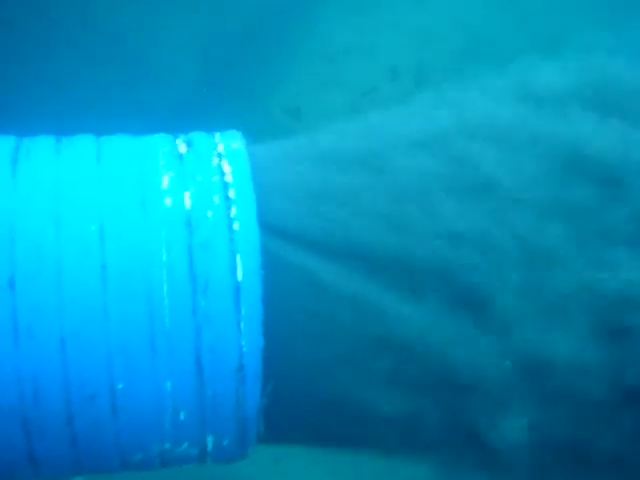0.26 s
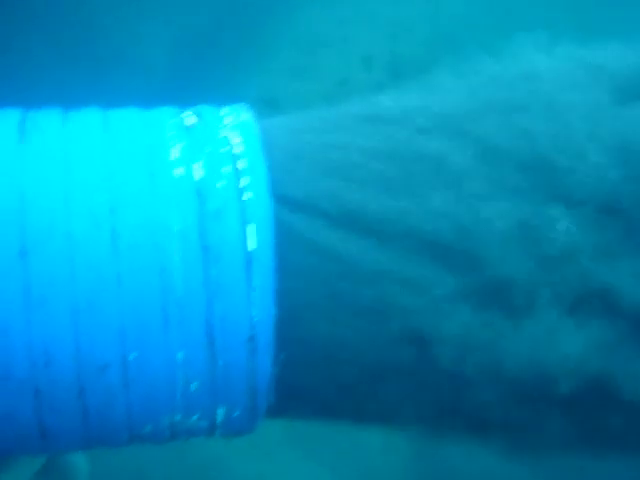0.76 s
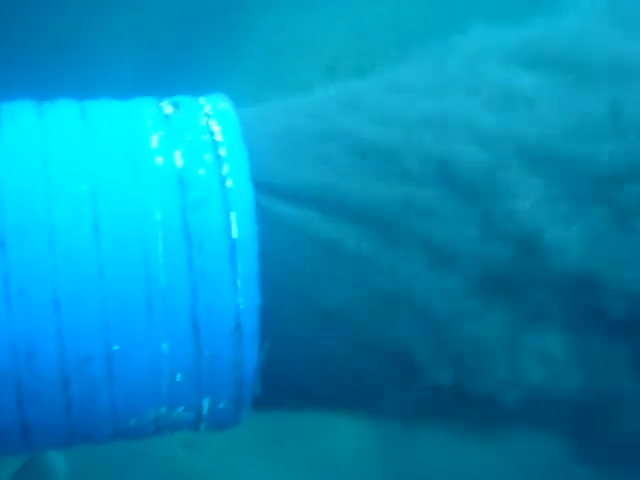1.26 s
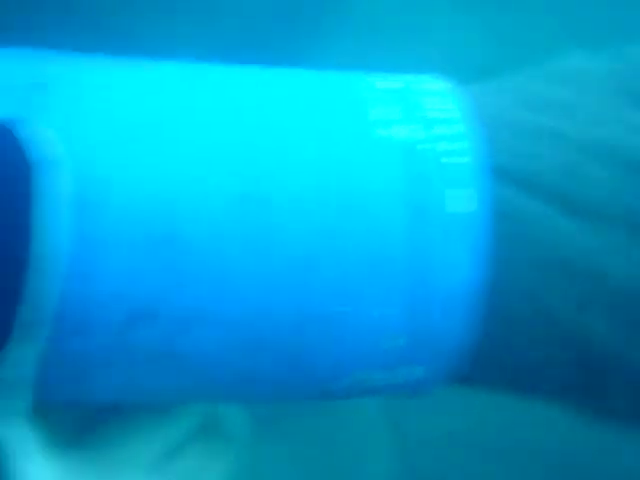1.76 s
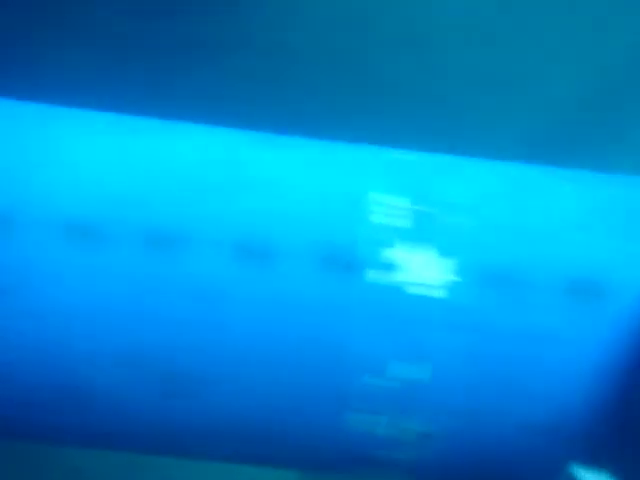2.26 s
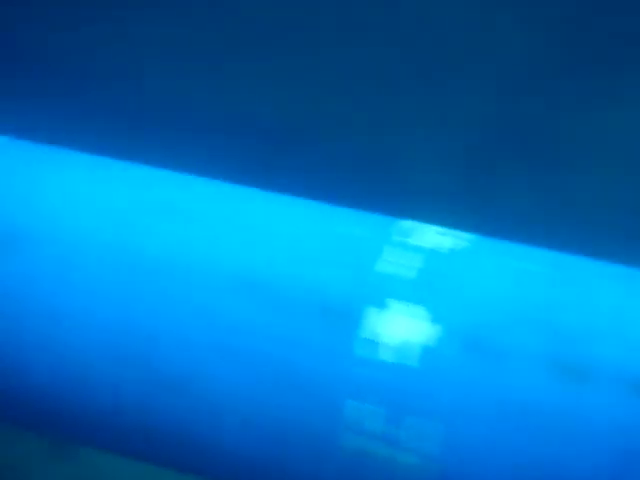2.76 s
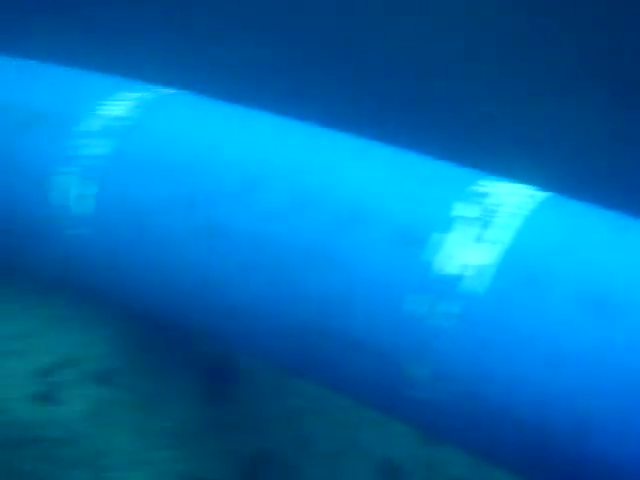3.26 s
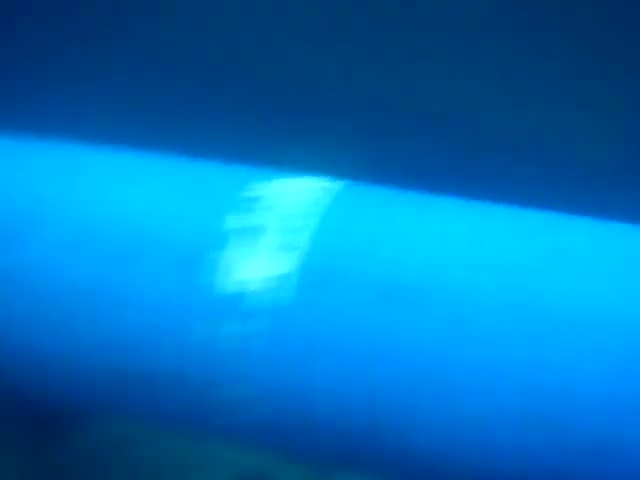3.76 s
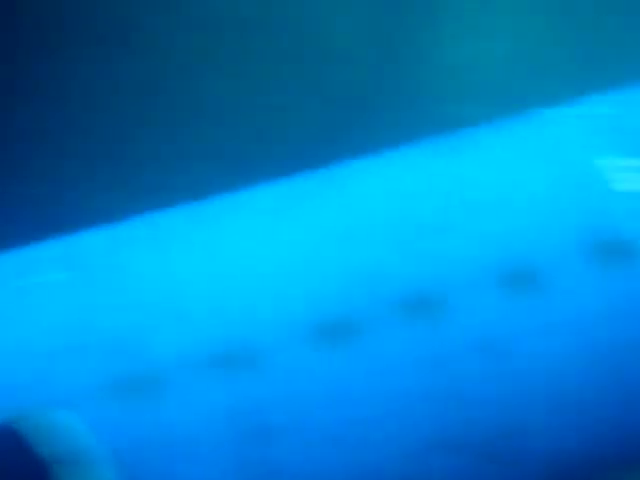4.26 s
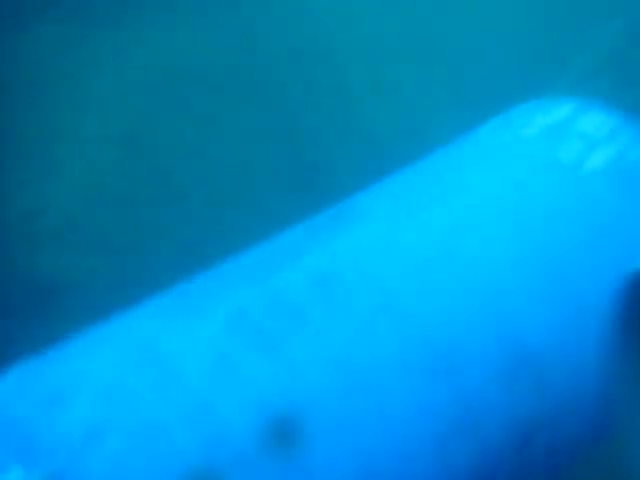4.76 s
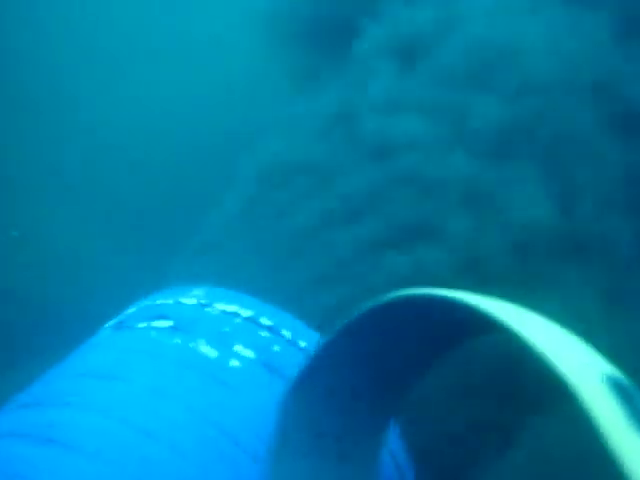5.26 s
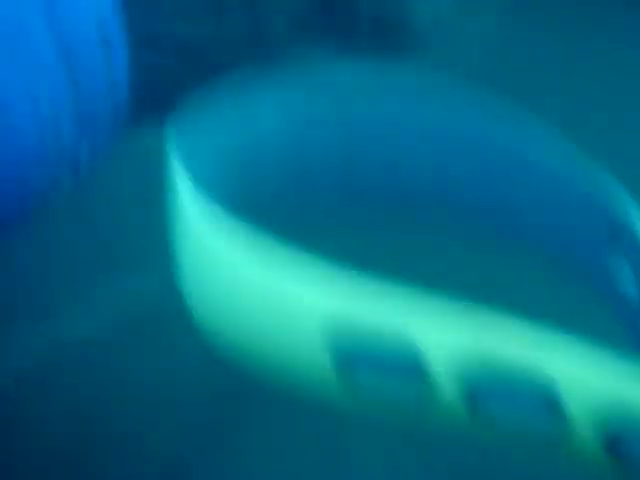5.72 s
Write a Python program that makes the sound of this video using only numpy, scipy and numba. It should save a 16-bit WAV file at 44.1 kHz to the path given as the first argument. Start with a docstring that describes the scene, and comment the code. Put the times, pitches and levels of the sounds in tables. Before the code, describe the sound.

A continuous rough, hissing suction roar fills the whole stretch, mixed with a metallic pump whine and a low-mid motor hum. A faint tick comes early. Along the hose the colour changes and some whine tones fade; around four seconds the midrange roar swells, then a loud click. Near the end the hiss dulls, bubbles plop upward and a deep rumble surges. Close, muffled-bass camera microphone under water, no open-air echo.

```python
"""Water and sand rush hissing through a dredge hose under water, with the pump's whine and the motor's hum.
The rush is shaped noise; with the faint overtones of the whine it passes the resonances of hose and camera housing,
whose strengths follow the camera as it turns from the mouth, along the hose and past the mouth again.
The echo off the hose wall cuts a moving dip into the treble of that sum. Sine overtones of pump and motor,
a deep rumble with a low drone, pulses for ticks and rising decaying sines for bubbles are added on top."""
import sys
import numpy as np
from scipy import signal
from scipy.fft import rfft, irfft, next_fast_len
from scipy.io import wavfile
from scipy.ndimage import uniform_filter1d
from numba import njit

SR = 44100
rng = np.random.default_rng(int(sys.argv[2]) if len(sys.argv) > 2 else 0)


def inscribe(sig):
    """Save sig as 16-bit PCM at rate SR to the path in sys.argv[1].

    A 1-D sig is mono; a 2-D sig holds one channel per row.
    Samples are clipped to [-1, 1] before scaling.
    """
    pcm = np.round(np.clip(np.atleast_2d(sig).T, -1, 1) * 32767)
    wavfile.write(sys.argv[1], SR, pcm.astype(np.int16))


N = 264159
T = np.arange(N) / SR  # time in seconds
FFT_LENGTH = next_fast_len(N, True)
HZ = np.maximum(np.fft.rfftfreq(FFT_LENGTH, 1 / SR), 1)  # kept off zero for the divisions


def undb(db):
    """Level law: decibels to an amplitude factor."""
    return 10 ** (np.asarray(db) / 20)


def walk(rate):
    """Band-limited random modulation: a new level every 1 / rate s, joined smoothly, spread near 1."""
    draws = rng.standard_normal(int(T[-1] * rate) + 3)
    steps = uniform_filter1d(np.repeat(draws, 8), 8)
    smooth = uniform_filter1d(steps, 8)
    return 1.3 * np.interp(T * rate * 8, np.arange(len(steps)), smooth)


def flutter(rate):
    """High-passed modulation: a quick walk without its slow drift."""
    quick = walk(rate)
    return quick - uniform_filter1d(quick, int(4 * SR / rate))


def plateau(times):
    """Piecewise-linear envelope: rises from 0 to 1, holds and falls back."""
    return np.interp(T, times, (0, 1, 1, 0))


def shaped(x, gain):
    """Zero-phase filtering: weights the spectrum by a gain per frequency."""
    return irfft(rfft(x, FFT_LENGTH) * gain, FFT_LENGTH)[:N]


def stack(phase, orders, waver_db, rate):
    """Harmonic synthesis: sines on multiples of one phase, each wavering in level on its own."""
    total = 0
    for order, level_db in orders:
        amplitude = np.sqrt(2) * undb(level_db + waver_db * walk(rate))  # level is rms
        total = total + amplitude * np.cos(order * phase + 2 * np.pi * rng.random())
    return total


def camera_shares():
    """Panning law: the shares of the view along the hose and past the mouth, 0 to 1."""
    # Path of the camera. Each row: time in seconds, share along the hose, share past the mouth.
    path = [(0, 0.08, 0.29), (.5, 0.21, 0), (1.5, 0.22, 0.07), (2, 0.55, 0), (2.8, 0.99, 0.05),
            (3.6, 0.99, .05), (4, 0.73, .04), (4.6, .07, 0.35), (5.2, 0.01, 0.56), (5.8, 0.09, 0.89),
            (5.99, 0.08, 0.85)]
    s, *shares = np.transpose(path)
    return [np.clip(np.interp(T, s, share), 0, 1) for share in shares]


def flow(boom_db):
    """Turbulence noise of one unit of power per hertz, amplitude-modulated by random flutter, in treble most."""
    foot_hz, boom_hz, treble_hz = 200, 750, 6300  # lower slope, top of the boom, foot of the treble
    roar_hz, roar_width_hz, roar_db = 2900, 650, 2.5
    roar_s = (3.65, 3.9, 4.8, 5.4)  # roar starts to swell, is full, starts to fade, is gone
    white = rng.standard_normal(N) * np.sqrt(SR / 2)
    water = shaped(white, 1 / np.sqrt(1 + (foot_hz / HZ) ** 4))
    boom = shaped(water, 1 / (1 + (HZ / boom_hz) ** 4))
    roar = shaped(water, np.exp(-((HZ - roar_hz) / roar_width_hz) ** 4))
    treble = shaped(water, 1 / (1 + (treble_hz / HZ) ** 8))
    roar_gain = undb(roar_db * plateau(roar_s) + 1.03 * flutter(11))
    middle = water - boom - treble + roar * (roar_gain - 1)
    middle_db = 0.8 * flutter(21.97) + 1.03 * flutter(80)
    treble_db = 0.44 * middle_db + 2.0 * flutter(120) + 0.8 * flutter(9)
    hiss = middle * undb(middle_db) + treble * undb(treble_db)
    return boom * undb(boom_db + 1.1 * flutter(50)) + hiss


def vane_phase():
    """Vane-passing rate integrated to a phase in radians: under load the pump slows for a while."""
    free_hz, sag_hz = 354.06, 0.5
    sag_s = (2.9, 3.3, 4.65, 5.45)  # starts to sag, is lowest, starts to recover, is back
    rate_hz = free_hz - sag_hz * plateau(sag_s) + 0.0598 * walk(3.05)
    return 2 * np.pi * np.cumsum(rate_hz) / SR


def faint_whine(vane):
    """Harmonics of the vane-passing rate that lie near the flow noise."""
    # Each row: multiple of the vane rate, level in dB over one hertz of flow noise (ahead of the resonances).
    faint = [(2, 19.5), (3, 16), (4, 10), (5, 10.5), (6, 14.5), (9, 18), (11, 17), (15, 11.5), (17, 3.5),
             (18, -4), (19, 16), (20, 3.5), (21, 9), (22, 10.5), (23, 13.5), (24, 20.5), (26, 20.5),
             (27, 23), (28, 17.5)]
    return stack(vane, faint, waver_db=1.5, rate=2.4)


def body(x, along, past):
    """Modal filtering: steep resonances whose strengths depend on where the camera points."""
    # Resonances of hose and housing. Each row: centre in Hz, half-width to -6 dB in Hz,
    # gain in dB at the mouth, gain in dB along the hose, gain in dB past the mouth.
    resonances = [(252, 26, -41.5, -55, -48.5), (277, 94.7, -48, -47, -42),
                  (385.5, 58.8, -39.5, -42.5, -36.5), (450, 54, -49, -46, -41),
                  (536, 29, -51.5, -60, -75.5), (673, 160, -83, -57, -74), (1192, 83, -49.5, -50.5, -66),
                  (1322, 100, -51, -46.5, -55), (1462, 117, -50.5, -44, -54), (1792, 145, -58, -57, -64),
                  (2127, 120, -58, -57, -69), (2495, 121, -43.5, -43, -61), (2702, 178, -46, -46.5, -55),
                  (2967, 150, -48.5, -47.5, -65), (3130, 240, -50, -52.5, -58), (3485, 200, -54, -57, -54),
                  (4007, 184, -49.5, -52.5, -74), (4164, 102, -49.5, -58.5, -53),
                  (4590, 200, -55.5, -56, -64), (4870, 210, -59, -65, -62.5), (5320, 230, -81, -50, -54),
                  (5735, 217, -47, -51.5, -57.5), (6330, 140, -63.5, -61, -51),
                  (6794, 175, -53, -54, -70.5), (7240, 260, -54, -61, -58.5),
                  (7930, 270, -57.5, -56.5, -60.5), (8264, 270, -58.5, -63.5, -62),
                  (9230, 220, -69.5, -73.5, -67), (9336, 190, -62, -65.5, -58),
                  (9750, 170, -66, -70.5, -59)]
    hz, width, *views_db = np.transpose(resonances)
    centre, half_width = hz[:, None], width[:, None]
    detuning = (HZ / centre - centre / HZ) * centre / (2 * half_width)
    power = 1 / (1 + detuning ** 2) ** 2
    mouth, side, behind = (shaped(x, np.sqrt(undb(db) ** 2 @ power)) for db in views_db)
    return np.clip(1 - along - past, 0, 1) * mouth + along * side + past * behind


@njit
def band(x, hz, width):
    """State-variable resonator: a band-pass with a moving centre, gain 1 at the centre."""
    y = np.empty(len(x))
    band_state, low_state = 0., 0.
    for i in range(len(x)):
        g = np.tan(np.pi * hz[i] / SR)
        damping = width / hz[i]
        v = (band_state + g * (x[i] - low_state)) / (1 + g * (g + damping))
        band_state = 2 * v - band_state
        low_state = low_state + 2 * g * v
        y[i] = damping * v
    return y


def echo_dip(x):
    """Interference: the echo off the hose wall cancels part of a moving band, 2200 Hz wide, in the treble."""
    # Each row: time in seconds, centre in Hz, depth from 0 to 1 (whole cancellation at the centre).
    dip = [(0, 9600, .4), (2, 9250, 0.38), (2.8, 7380, 0.48), (4, 7100, .7), (4.12, 8400, 0.6),
           (4.25, 9400, 0.8), (4.6, 9800, 0.54), (4.9, 10200, .02), (5.5, 8050, 0.05), (5.99, 8000, 0.64)]
    s, hz, depth = np.transpose(dip)
    cancelled = band(x, np.interp(T, s, hz), 2200.)
    return x - np.clip(np.interp(T, s, depth), 0, 1) * cancelled


def loud_whine(vane, views):
    """Strong vane-passing harmonics: directional levels that drift as the camera sways, some fading briefly."""
    # Each row: multiple of the vane rate, rms level in dB at the mouth, along the hose and past the mouth,
    # all before drift and fades.
    loud = [(7, -28.5, -25.5, -32), (8, -28.5, -26.5, -35.5), (10, -25, -30, -30.5), (12, -26, -37, -29),
            (13, -33, -31.5, -40), (14, -32.5, -42, -43), (16, -33, -31.5, -38.5)]
    # Fades as the camera moves. Each row: centre in seconds, multiple of the vane rate, depth in dB,
    # half-length in seconds (to 1/e of the depth).
    fades = [(.05, 10, -6, 0.18), (2.6, 7, -10.5, .4), (2.6, 10, -2, 0.38), (3.6, 12, -12, 0.31),
             (4.85, 13, -8, 0.22), (5.3, 7, -12, 0.24), (5.7, 8, -5, .35)]
    orders = []
    for order, *views_db in loud:
        level_db = views_db @ views + 0.8 * walk(2.37)
        for s, faded_order, depth_db, half in fades:
            if faded_order == order:
                level_db = level_db + depth_db * np.exp(-((T - s) / half) ** 2)
        orders.append((order, level_db))
    return stack(vane, orders, waver_db=1.02, rate=8)


def motor_hum(views):
    """Harmonics of a steady motor rate: directional levels that drift as the camera sways."""
    # Each row: multiple of the hum rate, rms level in dB at the mouth, along the hose and past the mouth,
    # all before drift.
    hum = [(1, -26.5, -26, -21), (2, -49, -36.5, -63.5), (5, -35.5, -29, -39.5)]
    hum_hz = 303.3
    orders = [(order, views_db @ views + 0.7 * walk(2.37)) for order, *views_db in hum]
    return stack(2 * np.pi * hum_hz * T, orders, waver_db=1.02, rate=8)


def swells():
    """Gaussian envelopes: bell-shaped changes of rumble, boom and drone, in dB."""
    # Each row: time of the top in seconds, change in dB of rumble, of boom and of drone,
    # rise in seconds, fall in seconds.
    bells = [(0, 13.5, .5, -7, .1, .2), (.8, 0, 0.1, 9.5, .4, 0.49), (4.7, 2, -1.5, 3.5, 0.53, .6),
             (5.58, 2, 2.2, .1, .08, 0.11), (5.92, 20, 1.5, 2, 0.19, .08)]
    total_db = 0
    for s, *changes_db, rise, fall in bells:
        bell = np.exp(-((T - s) / np.where(T < s, rise, fall)) ** 2)
        total_db = total_db + np.outer(changes_db, bell)
    return total_db


def water_rumble(swell_db):
    """Coloured noise: the deep rumble of the open water, at a swelling level."""
    # Corners of the spectrum. Each row: frequency in Hz, relative level in dB per Hz.
    spectrum = [(40, -40), (75, -15.5), (105, -2.5), (140, -0.5), (190, -5.5), (260, -24.5), (400, -62)]
    hz, db = np.transpose(spectrum)
    rumble = shaped(rng.standard_normal(N), undb(np.interp(np.log(HZ), np.log(hz), db)))
    return rumble * undb(-49 + swell_db) / np.std(rumble)


def microphone_noise():
    """Self-noise: steady low noise of the microphone, falling above 70 Hz."""
    mic = shaped(rng.standard_normal(N), 1 / (1 + (HZ / 70) ** 2))
    return mic * undb(-47) / np.std(mic)


def low_drone(swell_db):
    """Frequency modulation: a faint low sine whose pitch wanders."""
    drone_hz = 132.2 + 0.53 * walk(3.6)
    drone = np.sqrt(2) * np.sin(2 * np.pi * np.cumsum(drone_hz) / SR)
    return drone * undb(-51.5 + swell_db)


def grain_ticks():
    """Impact: each grain striking the housing gives one short pulse, the curvature of a bell curve."""
    # Each row: time of the peak in seconds, peak level in dB, centre frequency in Hz.
    ticks = [(.394, -15, 900), (4.5556, -4, 1250)]
    out = np.zeros(N)
    for s, db, hz in ticks:
        u = (np.pi * hz * (T - s)) ** 2
        out += undb(db) * (1 - 2 * u) * np.exp(-u)
    return out


def bubble_rings():
    """Damped oscillation: bubbles ring at a rising pitch while they die away."""
    # Each row: start in seconds, level in dB before attack and decay, starting pitch in Hz,
    # time to decay by 60 dB in seconds.
    bubbles = [(5.656, -8, 481, 0.09), (5.939, -6.5, 531, 0.096)]
    out = np.zeros(N)
    for s, db, hz, t60 in bubbles:
        age = np.maximum(T - s, 0)
        attack = np.minimum(age / 0.0049, 1)
        decay = 1000. ** (-age / t60)
        out += undb(db) * attack * decay * np.sin(2 * np.pi * hz * age * (1 + 2.56 * age))
    return out


def scene():
    """Superposition: flow and faint whine through resonances and echo dip, all other sources on top."""
    # One row: flow gain in dB at the mouth, along the hose and past the mouth.
    flow_db = (-2.5, -1.54, -1.15)
    along, past = camera_shares()
    views = np.array([np.clip(1 - along - past, 0, 1), along, past])
    views = views / views.sum(axis=0)
    rumble_db, boom_db, drone_db = swells()
    vane = vane_phase()
    rush = flow(boom_db) + faint_whine(vane)
    hose = echo_dip(undb(flow_db @ views) * body(rush, along, past))
    machines = loud_whine(vane, views) + motor_hum(views)
    deep = water_rumble(rumble_db) + microphone_noise() + low_drone(drone_db)
    return (hose + machines + deep + grain_ticks() + bubble_rings())[None]


def record(dry):
    """Saturation and band-limiting: the camera rounds the loudest peaks, thins the bass and cuts the top."""
    ceiling, bass_hz, top_hz = 0.86, 150, 10080  # ceiling as a share of full scale
    rounded = dry / (1 + (dry / ceiling) ** 6) ** (1 / 6)
    thin = signal.sosfilt(signal.butter(1, bass_hz, "high", fs=SR, output="sos"), rounded)
    return signal.sosfilt(signal.ellip(14, .3, 100, top_hz, fs=SR, output="sos"), thin)


dry = scene()
out = record(dry)
inscribe(out)
```